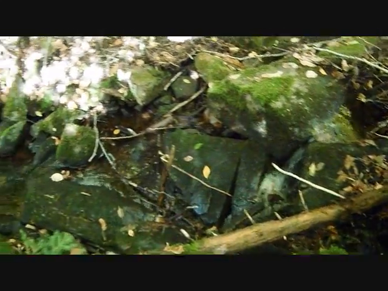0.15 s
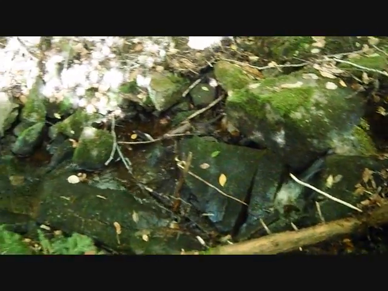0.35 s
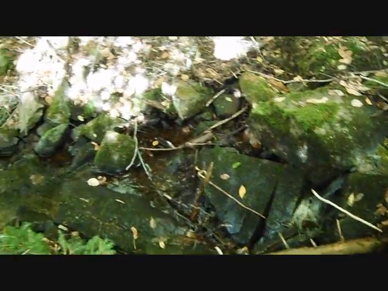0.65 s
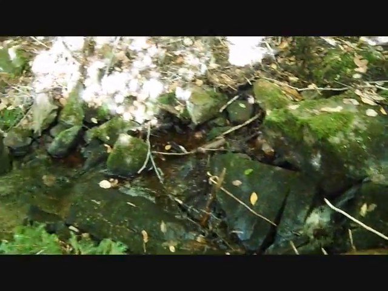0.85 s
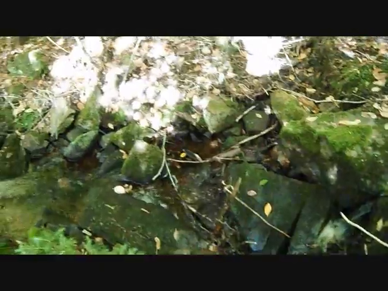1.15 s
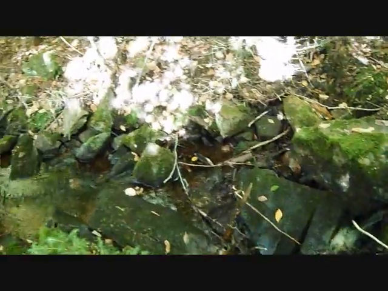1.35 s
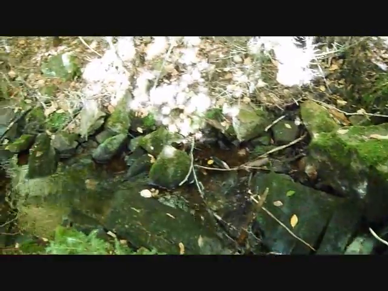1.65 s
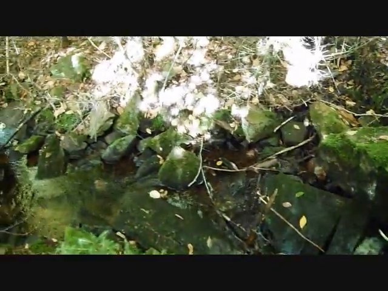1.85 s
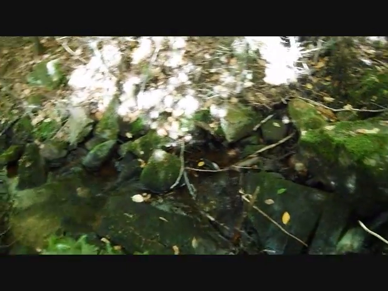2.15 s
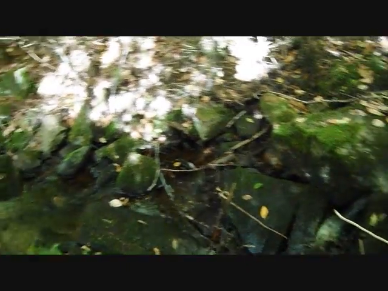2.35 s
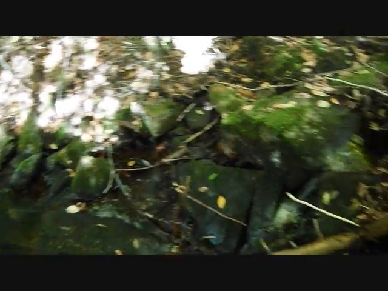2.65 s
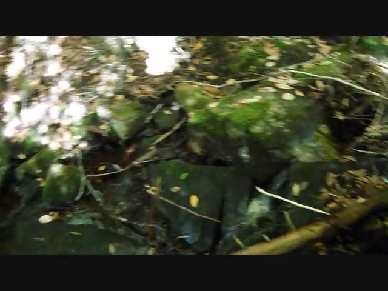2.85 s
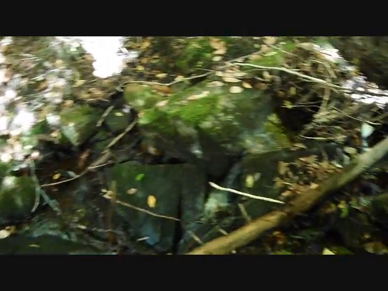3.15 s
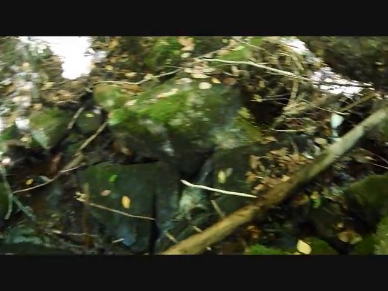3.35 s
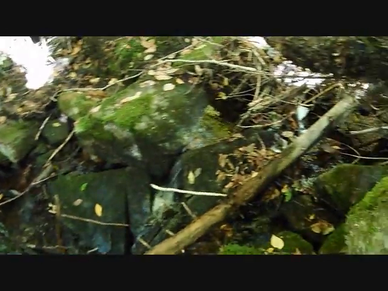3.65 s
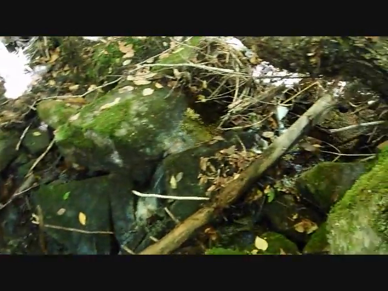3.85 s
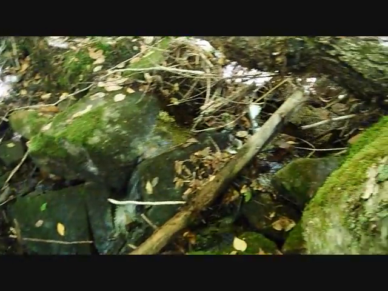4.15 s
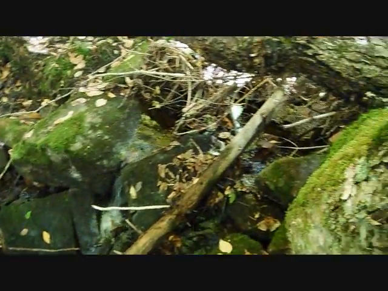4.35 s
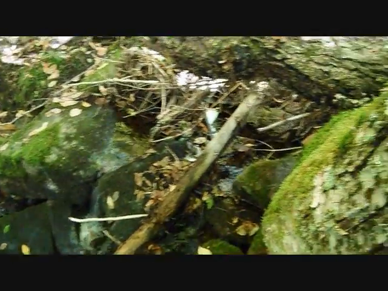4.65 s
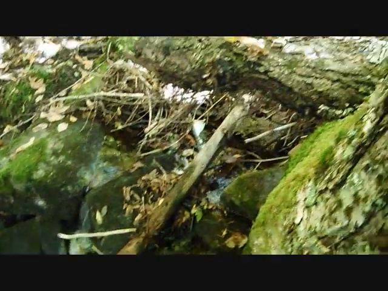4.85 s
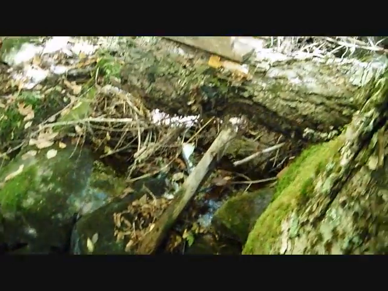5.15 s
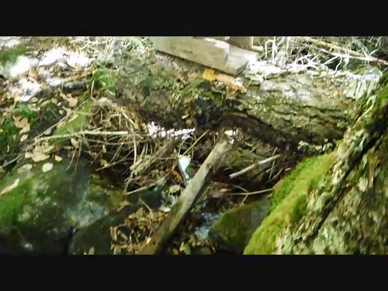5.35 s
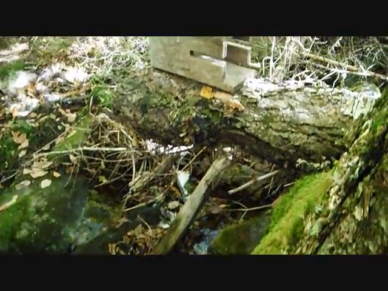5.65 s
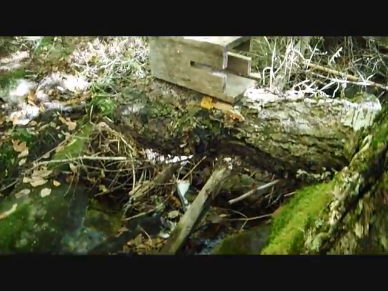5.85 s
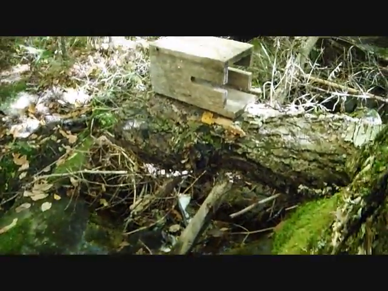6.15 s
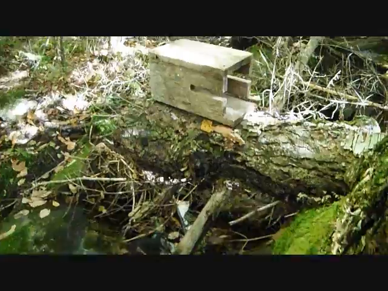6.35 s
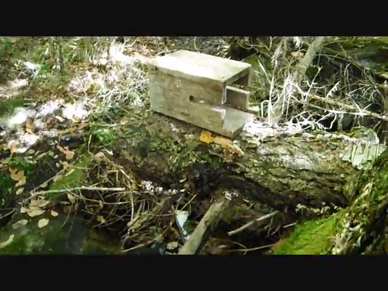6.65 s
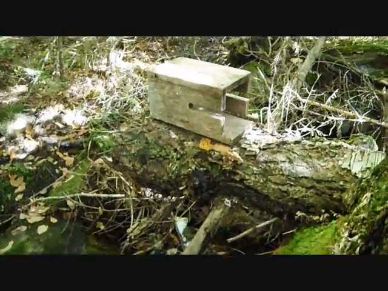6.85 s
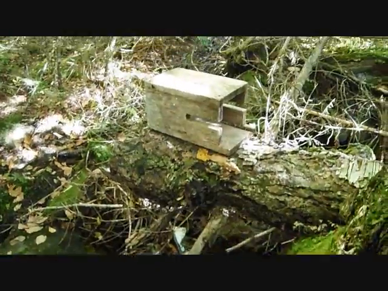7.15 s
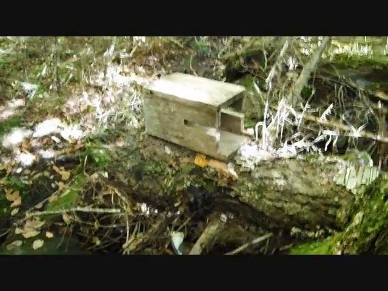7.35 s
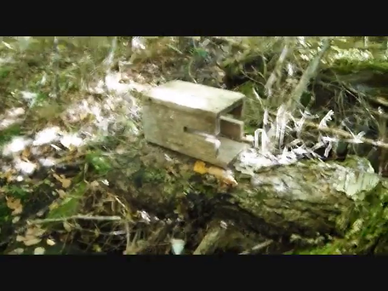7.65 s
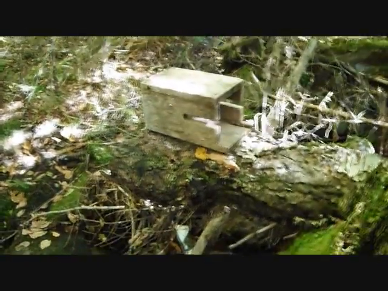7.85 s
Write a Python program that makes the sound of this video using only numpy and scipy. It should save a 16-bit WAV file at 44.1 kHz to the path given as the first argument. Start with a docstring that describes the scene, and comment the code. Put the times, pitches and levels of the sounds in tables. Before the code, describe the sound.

From 0 to 8 s a small brook runs steadily over mossy rocks in a wood, a bright continuous rush with gurgling and countless ringing bubbles. Spray ticks, short clear pops, rounder plops and brief wet smacks stand out irregularly throughout. The fizz is brightest around 2 s; strong smacks come near 1.7 and 2.9 s and a tight cluster of pops at 3.4-3.9 s. Mostly between 3 and 5 s the hand-held camera swings round, changing the water's colour and softening its finest fizz. Soft low handling rumbles swell around 5, 5.6-6.1 and 7.4-7.8 s. A light knock at 7.3 s is followed at once by a hard, dull, hollow one on the camera body, and loudness ducks briefly. At 7.95 s something snaps drily close by. Faint microphone hiss, low rumble and a very thin high whine remain underneath.

```python
"""A small brook runs over mossy rocks in a wood: from the start, a rush of noise and countless ringing bubbles,
with a little rumble, hiss and a thin whine beneath. Spray ticks, pops, plops and smacks, each a short ring
mixed with hiss, stand out all through. Mostly from 3 to 5 s the hand-held camera swings round and the rush
changes colour; later the hands shift and the rumble swells. Near the end the camera body is knocked, lightly
then hard, and something snaps close by: both are sets of ringing tones. Loud peaks make the whole sound duck."""
import sys
import numpy as np
from scipy import signal
from scipy.fft import rfft, irfft
from scipy.io import wavfile

SR = 44100
rng = np.random.default_rng(int(sys.argv[2]) if len(sys.argv) > 2 else 0)


def how_loud(loudness_db):
    """Turn decibels into a plain amplitude multiplier (0 dB gives 1, 20 dB gives 10)."""
    steps = np.asarray(loudness_db, float) / 20
    return 10 ** steps


def int16_out(signal):
    """Quantize to a 16-bit WAV file."""
    q = np.round(np.clip(np.atleast_2d(signal).T, -1, 1) * 32767)
    wavfile.write(sys.argv[1], SR, q.astype(np.int16))


N = 352837   # length in samples, about 8 s

# the brook's strength: t/s, rush level/dB, spray level/dB and finest fizz level/dB (both before colouring)
FLOW = [(0, -26, -1, -3), (2, -26.5, 1, 0), (3.3, -26, -2, -2.2), (4.5, -25.5, -2.5, -1.8),
        (5.5, -25.5, -3, -6.5), (7, -26, -2.5, -6.5), (8, -26.5, -3, -6)]
# the camera's swing: t/s, direction (0 faces the pool, 1 faces the log)
SWING = [(0, 0.063), (2, 0.067), (3, 0.11), (4, 0.33), (5, 0.77), (6, 0.81), (8, 0.88)]
# colour of the water at both ends of the swing: f/Hz, relative level per Hz/dB
FACING_POOL = [(59, -50), (100, -14.5), (248, -6.5), (541, -8), (800, -5.5), (2130, -3.5), (2810, 0),
               (4400, -13.5), (5750, -20.5), (8580, -11.5), (10800, -23), (12000, -20.5), (14500, -29),
               (16000, -29)]
FACING_LOG = [(59, -65), (100, -18), (228, -7.5), (355, -11.5), (530, -3.5), (800, -10), (2800, -1.5),
              (3470, -13.5), (4190, -11), (4660, -16.5), (5300, -8.5), (6550, -19), (8800, -10.5),
              (12000, -17), (15500, -25.5)]
# hollows among the rocks and the microphone's port: f/Hz, width/Hz, boost or cut/dB
HOLLOWS = [(228, 86, 4), (1210, 95, 4.5), (1415, 95, -3.5), (2790, 680, 3), (3330, 610, -2.5),
           (4195, 370, 4), (8470, 97, 3)]
GURGLE_DB = 2   # level of the low gurgle against the rush, before colouring

# the microphone's own hiss, mostly above the water's pitch range: rms level, lowest pitch
SELF_NOISE_DB, SELF_NOISE_HZ = -58, 13800
# low rumble: usual level, size of its slow wandering, speed of that wandering in Hz
RUMBLE_DB, LUMPS_DB, LUMPS_HZ = -50.5, 2, 5.2
# hands shifting on the camera, each swelling and fading alike: t/s, level/dB
GRIPS = [(4.97, -41), (5.57, -42), (5.93, -48), (6.1, -44), (7.38, -41), (7.75, -43)]
GRIP_RISE_S, GRIP_FALL_S = 0.047, 0.059
# a thin whine: t/s, level/dB
WHINE = [(0, -51), (1.5, -59), (2.5, -48), (3.6, -52.5), (4.8, -57), (8, -61)]
WHINE_HZ = 11719

# single sounds at set moments; levels are those before the swell and fade: t/s, level/dB, f/Hz
TICKS = [(0.5472, -14, 8460), (1.031, -16, 8400), (1.564, -11.5, 8700), (2.2494, -16, 8900),
         (2.2697, -17, 7240), (3.3398, -18, 8000), (4.696, -19, 8400), (5.9893, -17.5, 8260),
         (6.7077, -22, 8600), (7.1018, -18, 5170), (7.8785, -22, 6000), (7.9225, -23, 8720)]     # droplets striking rock
POPS = [(0.6718, -5.5, 2590), (1.225, -4, 2700), (1.4032, -3, 2600), (2.2058, -2, 2760),
        (2.4743, -5.5, 2600), (2.8642, -6, 2730), (2.8812, -3, 2950), (3.021, -5, 2460), (3.4423, -3, 2950),
        (3.4999, -4, 2730), (3.5409, -1, 2440), (3.5593, -2, 2720), (3.7836, 2, 2790), (3.7925, 2, 3070),
        (3.8245, -7, 3000), (3.8676, -7, 2900), (4.0538, -0.5, 2940), (4.5002, -4.5, 2920),
        (6.1365, -5, 2520), (6.54, -2, 2780), (6.6594, -3, 2600), (7.0348, 2, 2630), (7.0372, -5, 2600),
        (7.0435, -11, 2650), (7.1692, -0.5, 2420), (7.1727, -2.5, 2700), (7.2645, -1, 2700),
        (7.3815, -5, 2900), (7.385, -5, 2700)]       # small bubbles bursting
PLOPS = [(1.011, -19, 853), (1.013, -11, 1730), (1.415, -16, 1260), (1.642, -12, 2030), (1.794, -12, 1270),
         (2.097, -19, 444), (2.791, -15, 1200), (2.981, -10.5, 1250), (3.238, -19, 750), (3.926, -15, 1190),
         (4.356, -14, 710), (5.064, -16.5, 460), (6.32, -8.5, 1080), (6.85, -22, 247), (7.563, -17, 496),
         (7.877, -12.5, 1250), (7.907, -9.5, 1250)]     # large bubbles
SMACKS = [(1.7159, -1, 3630), (2.0525, -8, 3600), (2.0875, -5, 3580), (2.8764, 2, 3270), (3.8686, -1, 3970),
          (7.169, -8, 3900)]   # heavy drops smacking rock, short and wide
# more of each kind at random moments, mostly faint:
# rate/(1/s), mean level/dB, level spread/dB, middle f/Hz, pitch spread/octaves
CHANCE_TICKS = [(1.5, -21.5, 2, 7700, 0.2)]
CHANCE_POPS = [(3.2, -11.5, 2.7, 2610, 0.17)]
CHANCE_PLOPS = [(1.2, -20.5, 3.5, 1200, 0.035), (.8, -19, 4, 730, .35), (1.2, -15, -4, 1970, .12)]
CHANCE_SMACKS = [(3.1, -15, 2, 3600, 0.12)]

# knocks on the camera body: t/s, level of the blow/dB
KNOCKS = [(7.3103, -13), (7.3556, 0)]
# tones the body rings with: f/Hz, level against the blow/dB, time to fall by 60 dB/s
BODY = [(62, -14, 0.06), (430, -15, 0.07), (700, -2, 0.05), (875, -1, 0.035), (1160, -13, 0.03),
        (1700, -13, 0.014), (2500, -8, 0.014), (3540, -3, .016)]
SNAP_S, SNAP_DB = 7.9482, -5.5   # moment of the dry snap, level of its blow
# tones of the snap: f/Hz, level against the blow/dB, time to fall by 60 dB/s
SNAP = [(710, -13, 0.046), (1275, -3.5, 0.0097), (1870, -9, 0.021), (2600, 2, 0.0042), (3400, -14, 0.0068),
        (4120, -1.5, 0.0044), (5800, 5, 0.002), (9200, 0, 0.0019), (12700, -9, .002)]


def rms_one(x):
    """Scale to rms (average strength) 1."""
    return x / np.sqrt(np.mean(x ** 2) + 1e-20)


def in_time(rows):
    """Turn the columns of a time table into curves, one value per sample."""
    s, *columns = np.transpose(rows)
    return [np.interp(np.arange(N) / SR, s, c) for c in columns]


def drift(rate_hz):
    """Slow random wandering of spread 1: noise smoothed twice, made at every 40th sample."""
    r = np.exp(-2 * np.pi * rate_hz * 40 / SR)
    noise = rng.standard_normal(N // 40 + 2002)
    slow = signal.lfilter([1], [1, -2 * r, r * r], noise)[2000:]   # drop the filter's start-up
    return np.interp(np.arange(N) / 40, np.arange(len(slow)), rms_one(slow))


def band(x, low_hz, high_hz):
    """Keep mostly the pitches between two limits (Butterworth band-pass)."""
    return signal.sosfilt(signal.butter(2, [low_hz, high_hz], "band", fs=SR, output="sos"), x)


def ring(blows, hz, t60):
    """Each unit click starts a sine of height 1 that falls by 60 dB in t60 seconds."""
    r = how_loud(-60 / (t60 * SR))
    w = 2 * np.pi * hz / SR
    return signal.lfilter([0, np.sin(w)], [1, -2 * r * np.cos(w), r * r], blows + 1e-18)


def colour(x, spectrum, size=4096):
    """Filter without pre-echo (minimum-phase): a broad spectrum plus the hollows' peaks and dips."""
    hz = np.fft.rfftfreq(size, 1 / SR) + 1
    corners = np.array(spectrum)
    db = np.interp(np.log(hz), np.log(corners[:, 0]), corners[:, 1])
    for mid_hz, width_hz, top_db in HOLLOWS:
        db += top_db / (1 + (2 * (hz - mid_hz) / width_hz) ** 2)
    # folding the cepstrum forward puts all of the response after its start
    cepstrum = irfft(db * np.log(10) / 20)
    cepstrum[1:size // 2] *= 2
    cepstrum[size // 2 + 1:] = 0
    response = irfft(np.exp(rfft(cepstrum)))
    return signal.fftconvolve(x, response)[:N]


def clicks(per_s, spread_db, clump_db):
    """Random clicks of uneven size that come in clumps."""
    sizes = how_loud(spread_db * np.minimum(rng.exponential(1, N), 4)) * rng.choice([-1, 1], N)
    rate = per_s * how_loud(clump_db * (drift(9) + 0.6 * drift(25)))
    return sizes * (rng.random(N) < rate / SR)


def bubbles(low_hz, high_hz, per_s, cycles, spread_db, count=14):
    """Bubbles of many sizes, each falling 60 dB in so many cycles; together about flat in spectrum."""
    born = clicks(per_s, spread_db, clump_db=3.0)
    dealt = rng.integers(0, count, N)   # which pitch a bubble gets
    pitches = np.geomspace(low_hz, high_hz, count)
    return rms_one(sum(hz * ring(born * (dealt == k), hz, cycles / hz) for k, hz in enumerate(pitches)))


def water():
    """Far rush, near bubbles and splashes in four pitch ranges, coloured by the way the camera faces."""
    rush_db, spray_db, fizz_db = in_time(FLOW)
    splash = rms_one(clicks(900, spread_db=4.5, clump_db=5.5))   # shared by all ranges
    surge = 0.33 * drift(9.9)
    mix = 0
    for low_hz, high_hz, level_db, per_s, cycles, bubble_gain, splash_gain in [
            (60, 1317, GURGLE_DB, 250, 18.3, 0.45, 0.23),
            (1498, 4340, 0, 900, 39.0, 0.53, 0.44),
            (4520, 9800, spray_db, 2500, 37.0, 0.81, 0.46),
            (9360, 12700, fizz_db, 2800, 8.8, 0.74, 0.93)]:
        far = rng.standard_normal(N) * how_loud(surge + 1.6 * drift(59))
        near = bubbles(max(low_hz, 200), min(high_hz, 15000), per_s, cycles, spread_db=6.0)
        near *= np.sqrt(2 * (high_hz - low_hz) / SR)   # as dense per Hz as the far rush
        layer = far + bubble_gain * near + splash_gain * splash
        mix = mix + how_loud(level_db) * band(layer, low_hz, high_hz)
    swing = np.clip(in_time(SWING)[0], 0, 1)
    heard = (1 - swing) * colour(mix, FACING_POOL) + swing * colour(mix, FACING_LOG)
    # the rush level is that of the middle pitches
    return how_loud(rush_db) * heard / np.std(band(heard, 1340, 4500))


def own_hiss():
    """The microphone's own hiss: steady high noise."""
    return how_loud(SELF_NOISE_DB) * rms_one(band(rng.standard_normal(N), SELF_NOISE_HZ, 17500))


def rumble():
    """Lumpy low noise at the microphone port, swelling when the hands shift."""
    t = np.arange(N) / SR
    level = how_loud(RUMBLE_DB + LUMPS_DB * drift(LUMPS_HZ))
    for s, db in GRIPS:
        level = level + how_loud(db) * np.exp(-abs(t - s) / np.where(t < s, GRIP_RISE_S, GRIP_FALL_S))
    return level * rms_one(band(rng.standard_normal(N), 4.1, 90))


def whine():
    """A faint high sine that wavers in level."""
    level = how_loud(in_time(WHINE)[0] + 1.5 * drift(1.6))
    return level * np.sin(2 * np.pi * WHINE_HZ * np.arange(N) / SR)


def by_chance(kinds):
    """Rows (t/s, level/dB, f/Hz) at random moments, scattered round each kind's level and pitch."""
    rows = []
    for per_s, db, spread_db, hz, octaves in kinds:
        times = np.cumsum(rng.exponential(1, 60)) / per_s
        loud, high = rng.standard_normal((2, 60))
        drawn = np.transpose([times, db + spread_db * loud, hz * 2 ** (octaves * high)])
        rows += list(drawn[drawn[:, 0] < N / SR])
    return rows


def bursts(table, swell, cycles, rise, noisy, spread):
    """Quick swells (swell in cycles), dying rings that climb in pitch, and hiss round that pitch."""
    out = np.zeros(N + SR)
    for s, db, hz in table:
        turns = np.arange(int(60 * SR / hz)) * hz / SR   # time counted in cycles
        shape = (1 - np.exp(-turns / swell)) * how_loud(-60 * turns / cycles)
        tone = np.sin(2 * np.pi * turns * (1 + rise * turns))
        hiss = rms_one(band(rng.standard_normal(len(turns)), hz / spread, min(hz * spread, 15000)))
        start = round(s * SR)
        out[start:start + len(turns)] += how_loud(db) * shape * ((1 - noisy) * tone + noisy * hiss)
    return out[:N]


def ticks():
    """Spray droplets striking rock: high, mostly hiss, with a sudden start."""
    rows = TICKS + by_chance(CHANCE_TICKS)
    return bursts(rows, swell=0.14, cycles=87.0, rise=0.0016, noisy=0.85, spread=1.14)


def pops():
    """Small bubbles bursting: short, mostly clear rings."""
    rows = POPS + by_chance(CHANCE_POPS)
    return bursts(rows, swell=0.99, cycles=22.1, rise=0.00069, noisy=0.17, spread=1.3)


def plops():
    """Large bubbles: lower rings that swell more slowly and last longer."""
    rows = PLOPS + by_chance(CHANCE_PLOPS)
    return bursts(rows, swell=1.9, cycles=39.0, rise=0.00072, noisy=0.24, spread=1.6)


def smacks():
    """Heavy drops smacking rock: very few cycles, so the sound is short and wide in pitch."""
    rows = SMACKS + by_chance(CHANCE_SMACKS)
    return bursts(rows, swell=0.3, cycles=11.0, rise=0.004, noisy=0.15, spread=1.4)


def struck(hits, modes, contact_hz):
    """Every blow rings all the tones; a softer contact (lower contact_hz) is a duller click."""
    blows = np.zeros(N)
    for s, db in hits:
        blows[round(s * SR)] = how_loud(db)
    r = np.exp(-2 * np.pi * contact_hz / SR)
    blows = signal.lfilter([1 - r], [1, -r], blows + 1e-18)
    # neighbouring tones start in opposite directions, so the ring swells before it dies
    return sum((-1) ** k * how_loud(db) * ring(blows, hz, t60) for k, (hz, db, t60) in enumerate(modes))


def knocks():
    """Dull-edged blows, one light and one hard, set the camera body ringing."""
    return struck(KNOCKS, BODY, contact_hz=650)


def snap():
    """A dry snap: one sharp-edged blow and tones that die very quickly."""
    return -struck([(SNAP_S, SNAP_DB)], SNAP, contact_hz=15000)


def scene():
    """Add up water, rumble, whine, single drops and bubbles, knocks and snap."""
    background = water() + rumble() + whine()
    singles = ticks() + pops() + plops() + smacks()
    close = knocks() + snap()
    return (background + singles + close)[None]


def gain_control(x, threshold_db, slope, attack_s, release_db_s):
    """Peaks over the threshold pull the gain down quickly; it creeps back at a steady rate."""
    over = slope * np.maximum(20 * np.log10(abs(x) + 1e-9) - threshold_db, 0)
    creep = release_db_s * np.arange(N) / SR
    held = np.maximum.accumulate(over + creep, axis=-1) - creep
    r = np.exp(-1 / (attack_s * SR))
    return x * how_loud(-signal.lfilter([1 - r], [1, -r], held))


def roll_off(x):
    """The treble ends steeply here."""
    return signal.sosfilt(signal.butter(12, 16130, fs=SR, output="sos"), x)


def record(dry):
    """Add the microphone's hiss, control the gain, clip overloads and cut the top steeply."""
    held = gain_control(dry + own_hiss(), threshold_db=-5, slope=1.15, attack_s=0.014, release_db_s=8)
    clipped = np.clip(held, -1, 1)
    mix = signal.sosfilt(signal.cheby2(24, 60, 15900, fs=SR, output="sos"), clipped)
    return roll_off(mix)


dry = scene()
out = record(dry)
int16_out(out)
```